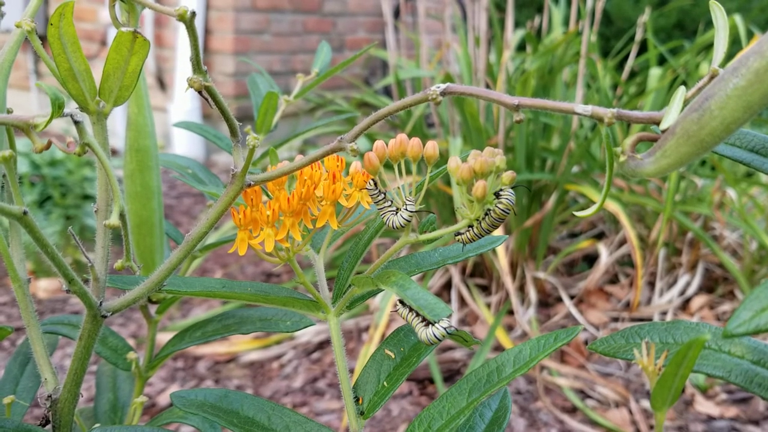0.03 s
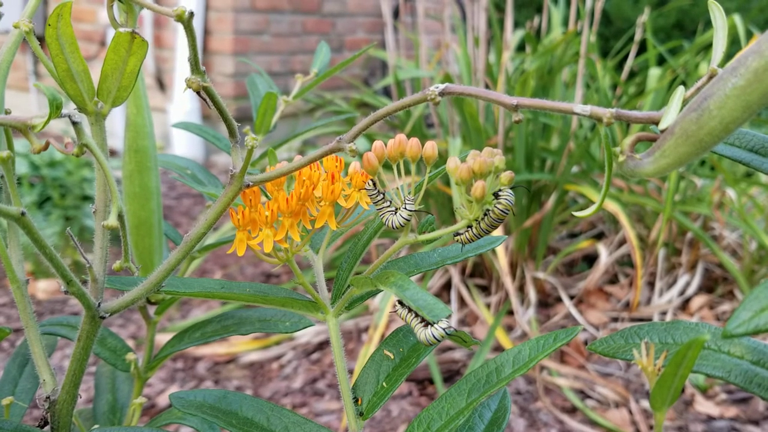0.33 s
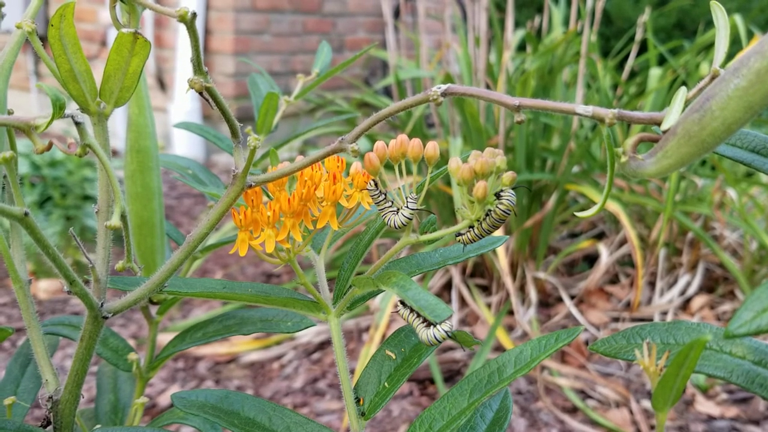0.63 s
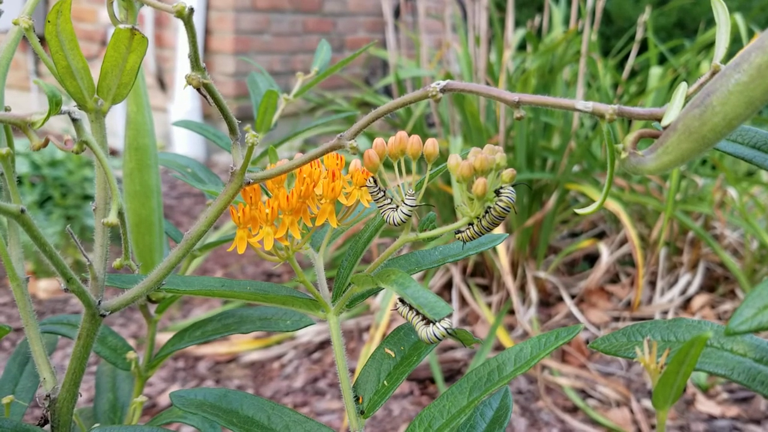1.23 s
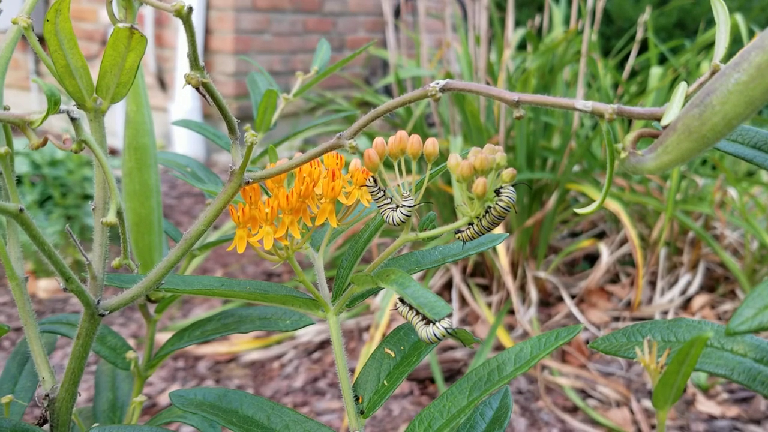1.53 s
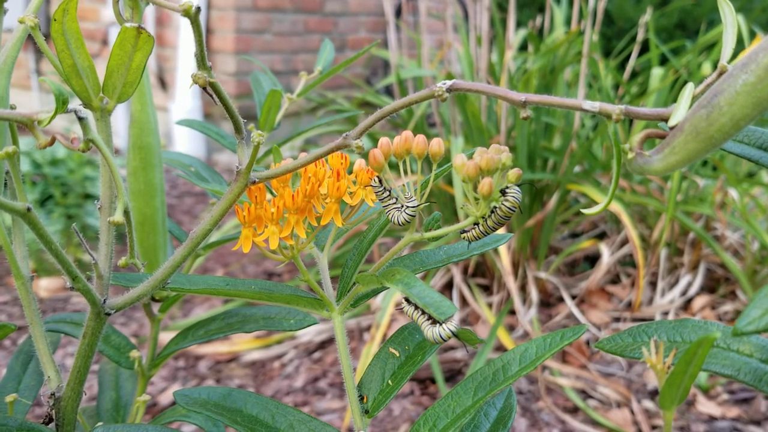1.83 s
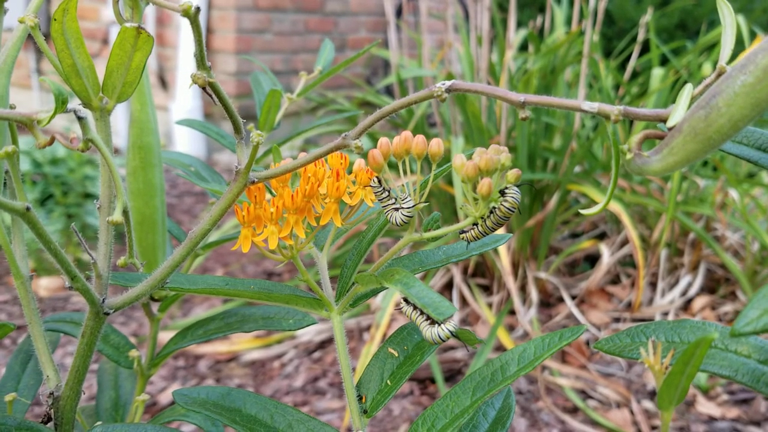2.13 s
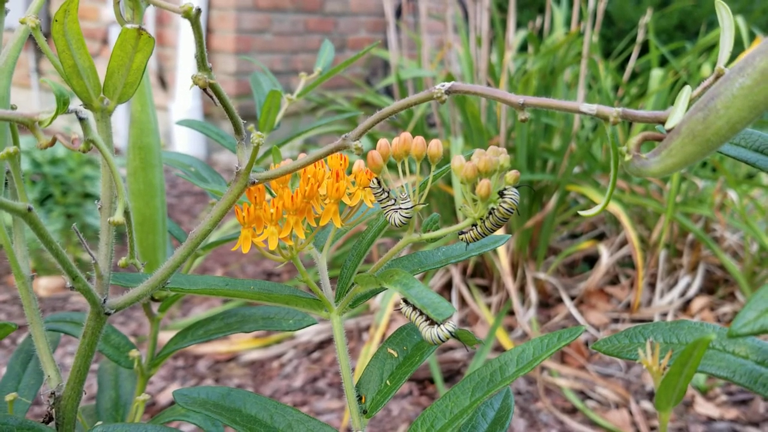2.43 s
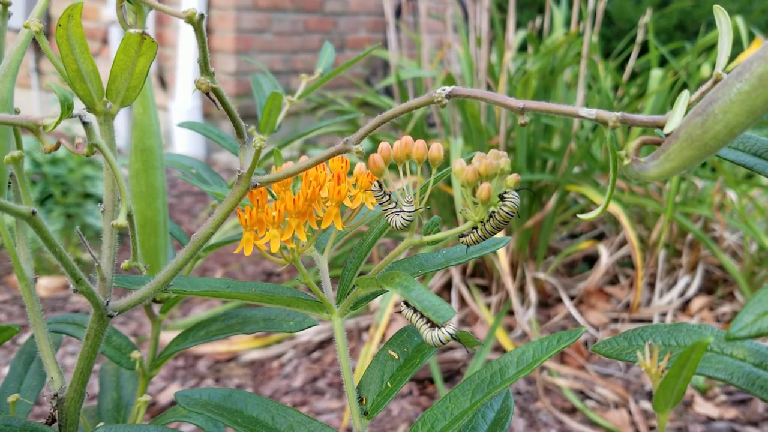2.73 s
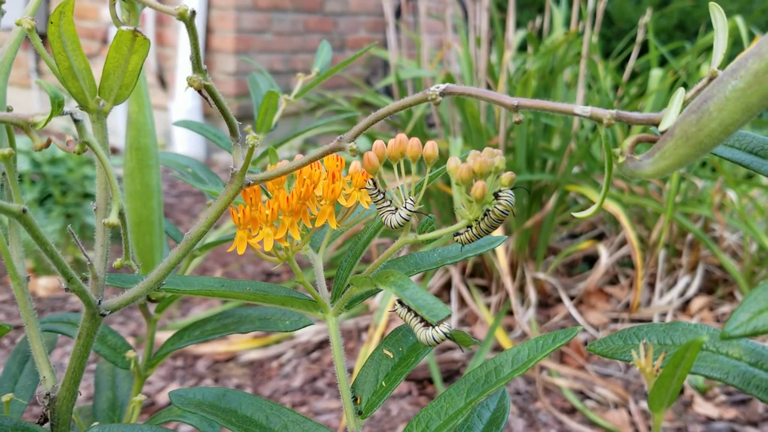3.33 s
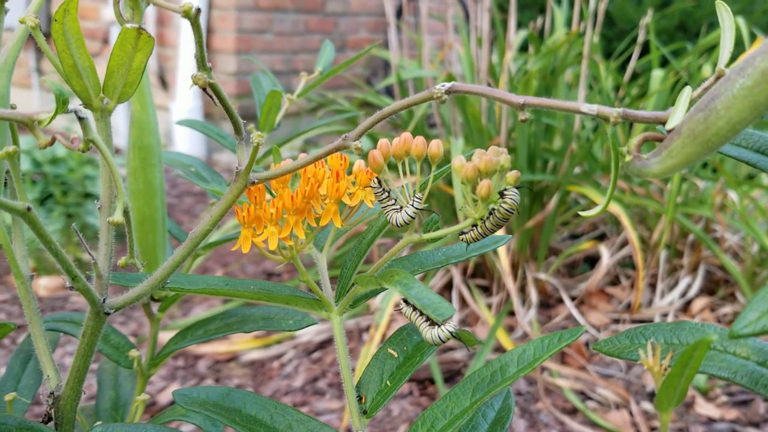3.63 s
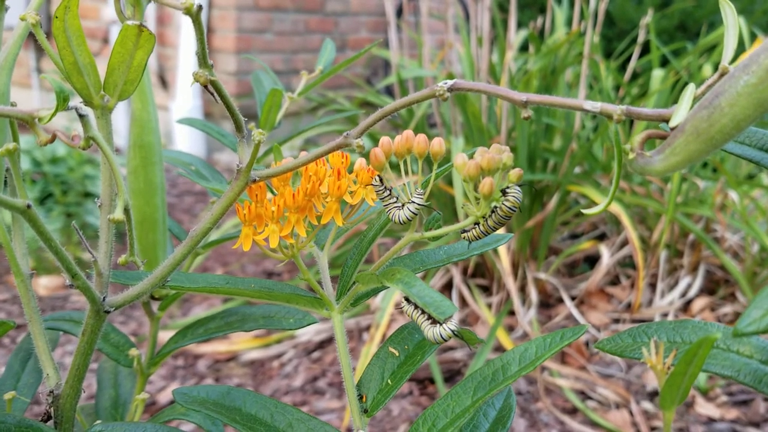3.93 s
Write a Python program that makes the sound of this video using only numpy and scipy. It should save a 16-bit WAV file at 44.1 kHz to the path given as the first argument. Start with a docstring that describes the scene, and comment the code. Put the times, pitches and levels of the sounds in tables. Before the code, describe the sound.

Low, far rumble and a steady machine hum fill a quiet flower bed. Crickets chirp faintly to the right; a very high insect buzz fades, then turns to ticks. Later come two soft knocks and tiny snaps near the microphone.

```python
"""Quiet flower bed beside a house.

A distant rumble lies under the fan wash and compressor hum of a machine, probably an air conditioner.
On the right, two small crickets chirp with their wings over a far insect chorus. A katydid-like insect
buzzes very high, dies away, then ticks. Plants close by give a few tiny snaps; two soft knocks sound."""
import sys
import numpy as np
from scipy import signal
from scipy.fft import rfft, irfft
from scipy.io import wavfile

SR = 44100
rng = np.random.default_rng(int(sys.argv[2]) if len(sys.argv) > 2 else 0)


def unload_wav(signal):
    """Save mono or channel-first audio to the path in sys.argv[1] as 16-bit WAV at rate SR, clipped to [-1, 1]."""
    wavfile.write(
        sys.argv[1],
        SR,
        np.round(np.clip(np.atleast_2d(signal).T, -1, 1) * 32767).astype(np.int16),
    )


N = 176400
RIGHT_LAG_S = 0.0002865


def amp(db):
    """Decibels to gain."""
    return 10 ** (np.asarray(db) / 20)


def unit_rms(x):
    """Scales to rms 1."""
    return x / np.sqrt(np.mean(abs(x) ** 2) + 1e-20)


def curve_at(points, hz, column=1):
    """Interpolates a table column over log frequency."""
    table = np.array(points)
    return np.interp(np.log(hz + 1), np.log(table[:, 0] + 1), table[:, column])


def add(mix, start_s, sound):
    """Mixes a sound in at start_s."""
    part = mix[..., max(round(start_s * SR), 0):][..., :sound.shape[-1]]
    part += sound[..., :part.shape[-1]]


def band(hz, width_hz, size=N):
    """Gaussian band of noise, rms 1; a random wander when centred on 0 Hz."""
    freqs = np.fft.rfftfreq(size, 1 / SR)
    bell = np.exp(-.5 * ((freqs - hz) / width_hz) ** 2)
    return unit_rms(irfft(rfft(rng.standard_normal(size)) * bell, size))


def garden_echo(x, t60_s=.25, echoes_per_s=2000):
    """Short scattered stereo echoes from wall and leaves."""
    t = np.arange(SR // 3) / SR
    taps = rng.standard_normal((2, len(t))) * amp(-60 * t / t60_s)
    taps *= rng.random(taps.shape) < echoes_per_s / SR
    taps /= np.linalg.norm(taps, axis=1, keepdims=True)
    return signal.fftconvolve(x[None], taps, axes=1)[:, :N]


# Likeness of the channels. Each row: frequency in Hz, left-right correlation.
CORRELATION = [(30, 0.52), (60, 0.83), (110, 0.84), (250, 0.79), (500, 0.63), (1300, 0.66), (2000, 0.42),
               (4000, 0), (8000, 0)]


def stereo_noise():
    """Frequencies and two partly correlated noise spectra at 0 dB per Hz; the right lags."""
    hz = np.fft.rfftfreq(N, 1 / SR)
    common, separate = rfft(rng.standard_normal((2, N))) * np.sqrt(SR / 2)
    likeness = curve_at(CORRELATION, hz)
    left = common * np.exp(2j * np.pi * hz * RIGHT_LAG_S)
    right = likeness * common + np.sqrt(1 - likeness ** 2) * separate
    return hz, np.array([left, right])


# Air and fan spectrum. Each row: frequency in Hz, left and right density in dB per Hz.
WASH_SPECTRUM = [(20.1, -100, -100), (100, -69.5, -71.5), (146, -70, -68), (199, -76, -73),
                 (333, -85.5, -85), (477, -86.5, -82.5), (694, -104, -86.5), (1310, -98, -86),
                 (1703, -103, -90), (2180, -108, -108), (2500, -109, -108), (2880, -111, -99),
                 (3670, -113, -99.5), (4130, -115, -111), (4700, -113, -108), (6450, -117, -104),
                 (8000, -118, -98.5), (8400, -124, -102), (8900, -123, -108), (10900, -114, -109),
                 (12700, -110, -103), (13300, -111, -105), (15700, -112, -104)]


def fan_wash(swell_db=0.77, swell_hz=4.6):
    """Soft fan wash and hiss of outdoor air, mostly from the right."""
    hz, noise = stereo_noise()
    density_db = [curve_at(WASH_SPECTRUM, hz, column) for column in (1, 2)]
    return irfft(noise * amp(density_db), N) * amp(swell_db * band(0, swell_hz))


# Rumble spectrum. Each row: frequency in Hz, density in dB per Hz.
RUMBLE_SPECTRUM = [(10, -100), (22, -91), (34, -72), (48, -64.5), (62, -53.5), (88, -60), (115, -65),
                   (160, -74.5), (300, -105), (1000, -170)]
# Rumble swells. Each row: time in seconds, level in dB before centring and scaling by depth.
RUMBLE_SWELLS = [(0.0, -32), (0.03, -41.5), (0.4, -47.5), (0.54, -37), (0.76, -45), (1.43, -40),
                 (1.99, -46), (2.14, -33.5), (2.22, -47), (2.26, -36.5), (2.48, -52), (2.53, -36.5),
                 (3.07, -42.5), (3.09, -49), (3.34, -36), (3.59, -43.5), (3.88, -36), (4.0, -45)]


def rumble(depth=0.72, pan_db=0.5):
    """Far, low noise with a lumpy level."""
    hz, noise = stereo_noise()
    steady = irfft(noise * amp(curve_at(RUMBLE_SPECTRUM, hz)), N)
    swells = np.interp(np.arange(N) / SR, *np.transpose(RUMBLE_SWELLS))
    return steady * amp(depth * (swells - swells.mean())) * amp([[pan_db / 2], [-pan_db / 2]])


# Compressor harmonics. Each row: multiple of the shaft rate, left and right level in dB.
HUM_HARMONICS = [(1, -61, -63), (2, -47, -47), (3, -59.5, -59), (4, -65.5, -61.5), (5, -65.5, -62),
                 (6, -66.5, -66.5), (7, -69.5, -65.5), (10, -72, -63.5), (11, -77.5, -82), (12, -90, -75.5),
                 (17, -79.5, -70.5), (18, -86, -76.5), (21, -94, -72.5), (22, -78.5, -76.5), (27, -89, -71),
                 (29, -100, -73), (33, -99, -81.5), (49, -105, -88), (50, -108, -77.5), (51, -102, -78),
                 (57, -104, -83.5), (59, -105, -82), (61, -106, -79), (62, -100, -78.5)]


def compressor(shaft_hz=59.13, drift=0.000501, drift_hz=1.925, waver_db=2.0, waver_hz=3.5):
    """Harmonics of one shaft, each wavering on its way through the garden."""
    turns = np.cumsum(shaft_hz * (1 + drift * band(0, drift_hz))) / SR
    stereo_turns = turns - np.array([[0], [RIGHT_LAG_S * shaft_hz]])
    out = np.zeros((2, N))
    for harmonic, left_db, right_db in HUM_HARMONICS:
        tone = np.sin(2 * np.pi * (harmonic * stereo_turns + rng.random()))
        waver = amp(waver_db * band(0, waver_hz))
        out += amp([[left_db], [right_db]]) * unit_rms(tone * waver)
    return out


# Chirps of the lower and higher cricket. Each row: start in seconds, stroke count, level in dB.
LOW_CRICKET_CHIRPS = [(.065, 7, -57.5), (.417, 7, -56.5), (.741, 8, -56.5), (1.095, 7, -56.5),
                      (1.442, 7, -57), (1.795, 7, -57), (2.142, 7, -56.5), (2.520, 7, -57.5),
                      (2.861, 8, -58.5), (3.217, 7, -57), (3.580, 7, -56.5), (3.965, 7, -56.5)]
HIGH_CRICKET_CHIRPS = [(0.002, 7, -59.5), (.447, 7, -59), (.777, 7, -58.5), (1.100, 7, -58),
                       (1.483, 7, -61), (1.785, 7, -61), (2.105, 8, -60), (2.426, 7, -59.5),
                       (2.739, 8, -59.5), (3.050, 7, -60), (3.362, 8, -59), (3.670, 7, -58)]


def cricket(chirps, period_s, stroke_s, top_hz, sag_hz, rough, first_db=-5.5, echo_db=-8, left_db=-32.5):
    """A chirp is a run of wing strokes, each a short tone that sags as the wing slows."""
    out = np.zeros(N)
    progress = np.linspace(0, 1, int(stroke_s * SR))
    envelope = np.sin(np.pi * progress) ** 1.48
    for start_s, strokes, db in chirps:
        for k in range(round(strokes)):
            jitter_s, jitter_db, jitter_hz = rng.standard_normal(3) * [.0003, 1, 45]
            hz = top_hz + jitter_hz - sag_hz * progress ** 2.59
            tone = np.sqrt(2) * np.sin(2 * np.pi * np.cumsum(hz) / SR)
            scrape = rough * band(top_hz - sag_hz / 2, width_hz=350, size=len(progress))
            gain = amp(db + jitter_db + first_db * (k == 0))
            onset_s = start_s + k * period_s - stroke_s / 2 + jitter_s
            add(out, onset_s, (tone + scrape) * envelope * gain)
    return (out + amp(echo_db) * garden_echo(out)) * amp([[left_db], [0]])


# Far chorus. Each row: pitch, spread and sag in Hz, strokes per second, left and right level in dB.
CHORUS_BANDS = [(5986, 204, 180, 420, -82, -70), (5543, 244, 200, 500, -85, -75.5),
                (7880, 200, 500, 220, -100, -71.5)]


def chorus(stroke_s=0.0091, voice_count=12, jitter_db=1.0, echo_gain=1.04):
    """Wing strokes of many distant crickets blur into narrow, flickering bands."""
    out = np.zeros((2, N))
    progress = np.linspace(0, 1, int(stroke_s * SR))
    for pitch_hz, spread_hz, sag_hz, strokes_per_s, left_db, right_db in CHORUS_BANDS:
        voices = np.zeros(N)
        for detune in np.linspace(-1.5, 1.5, voice_count):
            hz = pitch_hz + spread_hz * detune - sag_hz * progress ** 2
            stroke = np.sin(2 * np.pi * np.cumsum(hz) / SR) * np.sin(np.pi * progress)
            onsets = rng.random(N) < strokes_per_s / voice_count / SR
            train = onsets * amp(jitter_db * rng.standard_normal(N))
            voices += np.exp(-detune ** 2 / 4) * signal.oaconvolve(train, stroke)[:N]
        out += amp([[left_db], [right_db]]) * unit_rms(voices + echo_gain * garden_echo(voices))
    return out


# Buzz envelope. Each row: time in seconds, level in dB.
BUZZ_LEVELS = [(0, -66), (1.35, -67), (1.62, -90), (2.7, -84), (3.2, -74), (4, -73)]


def katydid_buzz(hz=15100, width_hz=600, left_db=-18, flutter_hz=60, flutter_db=1.8):
    """A long, fluttering, very high buzz that dies away and faintly returns."""
    level_db = np.interp(np.arange(N) / SR, *np.transpose(BUZZ_LEVELS))
    buzz = band(hz, width_hz) * amp(flutter_db * band(0, flutter_hz))
    return amp(level_db) * unit_rms(buzz) * amp([[left_db], [0]])


# Faint lisps and shorter ticks. Each row: start in seconds, level in dB.
KATYDID_LISPS = [(1.45, -73), (1.91, -72), (2.37, -72), (2.81, -68), (3.35, -70), (3.79, -71)]
KATYDID_TICKS = [(2.95, -72), (3.05, -71), (3.15, -64), (3.26, -67), (3.385, -70), (3.47, -64), (3.57, -63),
                 (3.668, -63), (3.77, -64), (3.874, -60), (3.975, -62)]


def katydid_rasps(rasps, length_s, hz, width_hz, left_db):
    """Short scrapes of a katydid's wing."""
    out, size = np.zeros((2, N)), int(length_s * SR)
    envelope = np.sqrt(np.hanning(size))
    for start_s, db in rasps:
        scrape = np.array([band(hz, width_hz, size) for _ in range(2)])
        add(out, start_s, amp(db) * envelope * scrape)
    return out * amp([[left_db], [0]])


# Snaps in the plants. Each row: start in seconds, level in dB, left minus right in dB.
PLANT_SNAPS = [(1.530, -70, -12), (1.975, -66, -12), (2.726, -68, 0), (3.213, -51.5, 0), (3.868, -58, 6)]


def plant_snaps(snap_hz=12000, snap_width_hz=3000, stem_hz=5500, stem_width_hz=500, decay_s=0.0017):
    """Dry stems and leaves give tiny bright snaps."""
    out, size = np.zeros((2, N)), 2048
    envelope = np.exp(-np.arange(size) / SR / decay_s)
    for start_s, db, pan_db in PLANT_SNAPS:
        for channel, side_db in zip(out, (pan_db / 2, -pan_db / 2)):
            snap = band(snap_hz, snap_width_hz, size) + band(stem_hz, stem_width_hz, size)
            add(channel, start_s, amp(db + side_db) * unit_rms(snap) * envelope)
    return out


# Soft knocks close by. Each row: start in seconds, level in dB, pitch in Hz.
SOFT_KNOCKS = [(2.002, -43, 300), (2.7265, -36.5, 650)]


def knocks(decay_s=.0012, contact_db=-7, contact_hz=1500, contact_s=.0003, echo_db=-2):
    """Light, heavily damped taps with a short contact tick, thrown back by the wall."""
    out, t = np.zeros(N), np.arange(SR // 20) / SR
    contact = amp(contact_db) * np.sin(2 * np.pi * contact_hz * t) * np.exp(-t / contact_s)
    for start_s, db, hz in SOFT_KNOCKS:
        body = np.sin(2 * np.pi * hz * t) * np.exp(-t / decay_s)
        add(out, start_s, amp(db) * (body + contact))
    return out + amp(echo_db) * garden_echo(out)


def scene():
    """Background, insects, snaps and knocks in stereo."""
    crickets = cricket(LOW_CRICKET_CHIRPS, period_s=.012, stroke_s=.0111,
                       top_hz=7920, sag_hz=1250, rough=0.24)
    crickets += cricket(HIGH_CRICKET_CHIRPS, period_s=.0122, stroke_s=.009,
                        top_hz=8410, sag_hz=400, rough=0.38)
    katydid = katydid_buzz()
    katydid += katydid_rasps(KATYDID_LISPS, length_s=0.1, hz=14800, width_hz=270, left_db=-10)
    katydid += katydid_rasps(KATYDID_TICKS, length_s=.035, hz=14200, width_hz=1500, left_db=-15)
    background = fan_wash() + rumble() + compressor()
    return background + crickets + chorus() + katydid + plant_snaps() + knocks()


def record(dry):
    """Steep low-pass at 15.8 kHz."""
    lowpass = signal.firwin(801, 15800, window=("kaiser", 9), fs=SR)
    return signal.oaconvolve(dry, lowpass[None], "same")


dry = scene()
out = record(dry)
unload_wav(out)
```